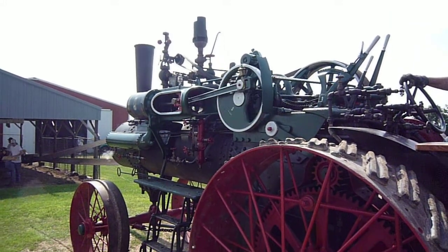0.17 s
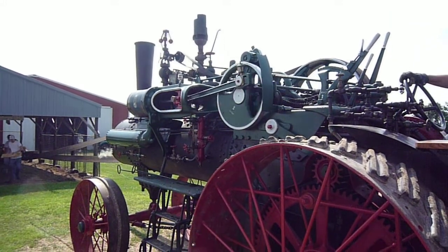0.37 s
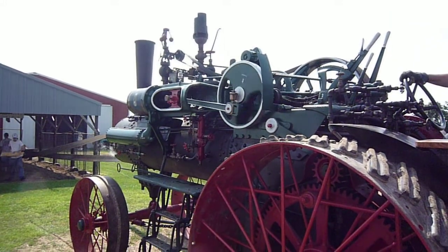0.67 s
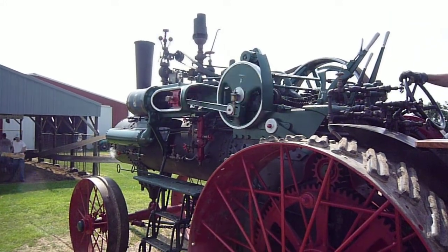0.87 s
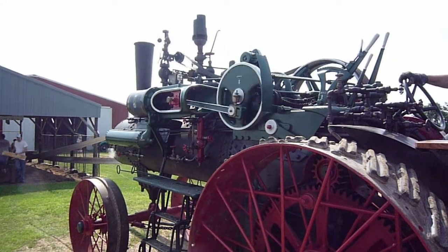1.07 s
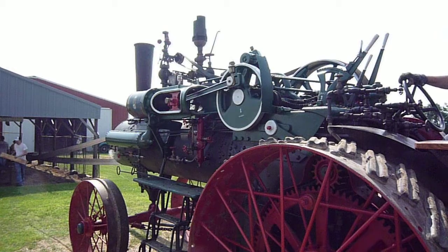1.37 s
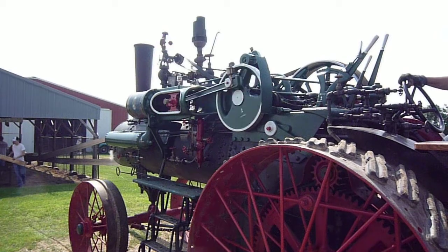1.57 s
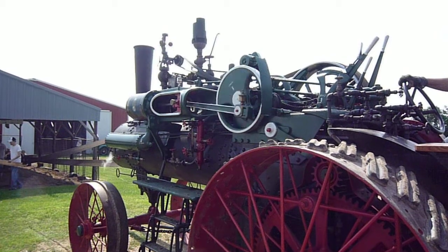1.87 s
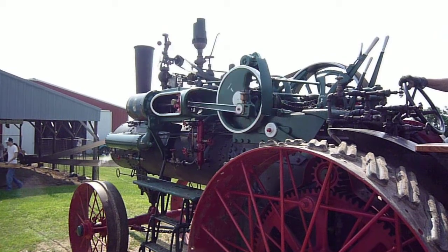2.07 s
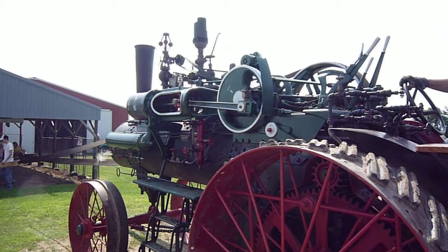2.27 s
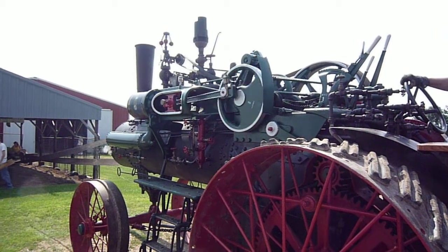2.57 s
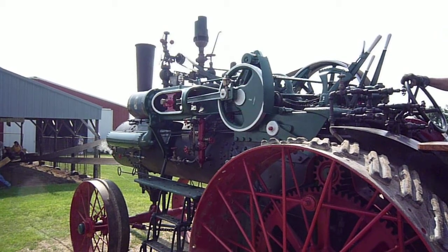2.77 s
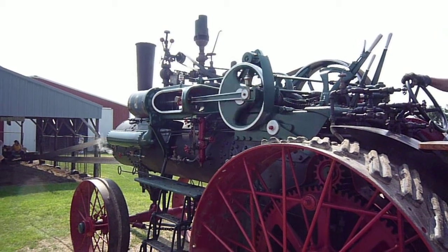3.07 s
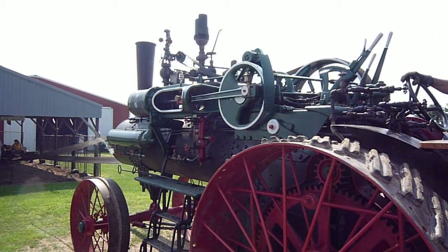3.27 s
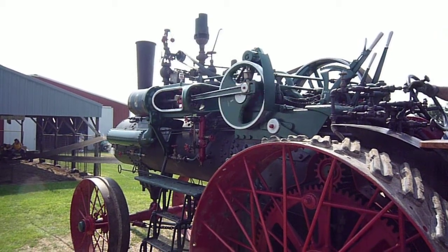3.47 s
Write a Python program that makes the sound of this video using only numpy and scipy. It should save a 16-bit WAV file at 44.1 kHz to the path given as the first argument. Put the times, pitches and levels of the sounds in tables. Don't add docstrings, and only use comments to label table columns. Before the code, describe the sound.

A steam traction engine runs throughout, outdoors and close. Uneven clusters of metallic knocks repeat about every 0.2 s, ringing a hollow casing near 1 kHz. Low exhaust thumps come every quarter second over rumbling, droning gear noise. Faint metal rings at 0.6-0.7 and 1.7 s, weak hiss at 0.6 s, a stronger steam spit near 1.3 s, then a clink and abrupt click-like skip around 1.39 s. Muffled treble; continues to the end.

```python
import sys
import numpy as np
from scipy import signal
from scipy.io import wavfile
from scipy.ndimage import uniform_filter1d

SR = 44100
rng = np.random.default_rng(int(sys.argv[2]) if len(sys.argv) > 2 else 0)


def linear_from_db(decibels):
    return 10 ** (np.asarray(decibels, float) / 20)


def inscribe(sig):
    pcm = np.round(np.clip(np.atleast_2d(sig).T, -1, 1) * 32767)
    wavfile.write(sys.argv[1], SR, pcm.astype(np.int16))


N = 160083
CUT_S, LOST = 1.38703, 997
M = N + LOST
FIRST_S, STROKE_S = -.0444, .20536

# offset t/s, frame level/dB, tines level/dB, plate level/dB, latch level/dB
STROKE_KNOCKS = [(-.078, -34, -48, -48.5, -48.5), (-.055, -27, -36, -47, -35.5),
                 (-.040, -30, -57.5, -50, -46.5), (0, -26.5, -39, -35, -35.5),
                 (0.01, -30.5, -50, -48.5, -45), (0.023, -33.5, -44.5, -40, -45.5),
                 (.034, -28.5, -38, -40.5, -39.5), (.088, -31.5, -55.5, -50.5, -38)]
# lift level/dB, slam level/dB, rebound level/dB, latch level/dB
STROKE_STRENGTHS = [(0.1, 0.1, 7.3, 0.5), (0.1, 1.5, 1.5, -0.5), (-1.5, -1.5, 0.5, -2), (1, 1, 2, 1),
                    (-0.3, 0.4, 0.5, 5.5), (1.4, 1, 3, 1.2), (1.5, -1.5, 3, 2), (-1, 4.7, 0, 0),
                    (-1.1, 1, 3, 0.5), (-1.7, 0.5, -0.5, 0.5), (-2, -1.5, 0.5, 0), (-0.5, 0, -1.5, -6),
                    (-1, 0, 3, -2), (-1.5, -1, 1.5, 0.8), (-0.4, 1, -2, 1.5), (0, 1.5, 2.5, 0),
                    (1.5, 1.5, 0.5, -1.5), (-0.2, 0.8, 2.1, 0), (-1.3, 4.5, 0.1, 0.1)]
KNOCK_GROUP = [0, 0, 0, 1, 1, 2, 2, 3]


def evened(x):
    return x / np.sqrt(np.mean(x ** 2) + 1e-20)


def resonate(x, hz, width):
    return signal.lfilter(*signal.iirpeak(hz, hz / width, SR), x)


def place(s):
    return round(s * SR) + LOST * (s > CUT_S)


def add(mix, at, sound):
    sound = sound[max(-at, 0):]
    part = mix[max(at, 0):][:len(sound)]
    part += sound[:len(part)]


def clatter():
    # f/Hz, bandwidth/Hz, level/dB
    frame_modes = [(244, 92, -10.5), (457.5, 36, -3.5), (580, 140, -6.5), (796, 210, -4), (962, 86, -3),
                   (1135, 190, -5), (1281, 51, -5.5), (1600, 240, -12)]
    tine_modes = [(2404, 97, 0.1), (2842, 43, 0.1), (3210, 84, 0.1)]
    plate_modes = [(2020, 600, -18.5), (3140, 99, -2), (3424, 50, -1.2), (3717, 270, 0), (3940, 130, 1.5)]
    latch_modes = [(1832, 41, 0.9), (1750, 140, -3)]
    scrape_s = [.007, .003, .0022, .004]
    blow_share = [.25, .45, .65, .45]
    slop_s, slop_db, colour_db = .0008, .5, 1.2
    rattle_per_s, rattle_db = 550, -42

    out = np.zeros(M)
    t = np.arange(-600, 1200) / SR
    knocks = np.array(STROKE_KNOCKS)
    strengths = np.array(STROKE_STRENGTHS)[:, KNOCK_GROUP]
    luck = rng.standard_normal((len(strengths), len(knocks), 40))

    size = linear_from_db(3 * np.minimum(rng.exponential(1, M), 3))
    struck = rng.random(M) < rattle_per_s / SR
    rattle = linear_from_db(rattle_db) * size * struck * rng.standard_normal(M)

    stroke_start = FIRST_S + np.arange(len(strengths))[:, None] * STROKE_S
    at = stroke_start + knocks[:, 0] + slop_s * luck[..., 0]
    at = np.round(at * SR).astype(int)
    inside = (at >= 0) & (at < M)
    for b, modes in enumerate([frame_modes, tine_modes, plate_modes, latch_modes]):
        scrape = np.exp(-(t / scrape_s[b]) ** 2) + .15 * np.exp(-abs(t) / .012)
        share = blow_share[b]
        for m, (hz, width, db) in enumerate(modes):
            level = knocks[:, b + 1] + strengths + slop_db * luck[..., 1]
            level += colour_db * luck[..., 2 + b * len(frame_modes) + m]
            train = np.zeros(M)
            train[at[inside]] = linear_from_db(level[inside])
            rub = signal.oaconvolve(train, scrape)[600:][:M] * rng.standard_normal(M)
            blow = np.linalg.norm(scrape) * rng.choice([-1, 1]) * train
            push = np.sqrt(1 - share ** 2) * rub + share * blow
            gain = linear_from_db(db) * np.sqrt(SR / width / 4)
            out += gain * resonate(push + rattle, hz, width)
    return out


def drum():
    knock_db = [-39, -32.5, -22.5, -23.5, -23, -27.5, -25.5, -33]
    pitch_hz, spread, rise_s, fall_s = 984, 0.036, 0.003996, .008
    out = np.zeros(M)
    t = np.arange(0, .06, 1 / SR)
    shape = (1 - np.exp(-t / rise_s)) ** 2 * np.exp(-t / fall_s)
    shape = shape / shape.max()
    luck = rng.standard_normal((len(STROKE_STRENGTHS), len(STROKE_KNOCKS), 3))
    for k, strength in enumerate(STROKE_STRENGTHS):
        for j, knock in enumerate(STROKE_KNOCKS):
            bend, push, turn = luck[k, j]
            tone = np.sin(2 * np.pi * (pitch_hz * (1 + spread * bend) * t + turn))
            level = knock_db[j] + strength[KNOCK_GROUP[j]] + push
            at = FIRST_S + k * STROKE_S + knock[0] - rise_s
            add(out, round(at * SR), linear_from_db(level) * shape * tone)
    return out


def stack():
    # t/s, level/dB
    chuffs = [(0.0, -28.5), (0.243, -28.5), (0.504, -29), (0.76, -28.5), (1.01, -37.5), (1.271, -29),
              (1.497, -26.5), (1.753, -32), (2.012, -30), (2.272, -30.5), (2.519, -27), (2.771, -29),
              (3.029, -38), (3.275, -31), (3.537, -29)]
    stack_hz, rise_s, fall_s = 76, 0.007, 0.02
    out = np.zeros(M)
    t = np.arange(9000) / SR
    shape = (1 - np.exp(-t / rise_s)) * np.exp(-t / fall_s)
    thump = shape / shape.max() * np.sin(2 * np.pi * stack_hz * t)
    for s, db in chuffs:
        add(out, place(s), linear_from_db(db - 2.5) * thump)
    return out


def clinks():
    # t/s, f/Hz, level/dB, length/s
    rings = [
        (0.11, 3430, -37.5, .035),
        (.61, 2536, -42, 0.15),
        (.645, 3424, -41, 0.071),
        (.70, 3585, -44, 0.078),
        (1.372, 2220, -28.5, 0.028),
        (1.445, 2230, -40.5, 0.052),
        (1.70, 2536, -40.5, 0.15),
        (1.735, 3418, -40.5, 0.05),
        (3.17, 3460, -45, 0.045),
    ]
    out = np.zeros(M)
    for s, hz, db, length in rings:
        t = np.arange(0, length, 1 / SR)
        swell = np.sin(np.pi * (t / length) ** 0.37)
        add(out, place(s), swell * linear_from_db(db) * np.sin(2 * np.pi * hz * t))
    return out


def steam_spits():
    # t/s, length/s, level/dB
    leaks = [
        (1.305, .11, -34),
        (.60, .17, -40),
    ]
    out = np.zeros(M)
    hiss = evened(resonate(rng.standard_normal(M), 2900, 1900))
    for s, length, db in leaks:
        t = np.arange(0, length, 1 / SR)
        add(out, place(s), np.sin(np.pi * t / length) * linear_from_db(db) * hiss[place(s):][:len(t)])
    return out


def wash():
    # f/Hz, level/dB (per Hz)
    spectrum = [(35, -41), (60, -3), (211, -3.5), (309, -3), (719, -4.5), (947, 2), (1460, -8.5),
                (3280, -19.5), (3700, -21.5), (4810, -47), (8140, -120)]
    wash_db = -29.5
    surge_db, surge_s = 0.6, .005
    third_db, third_s = 1, 0.026
    surge_hz = 500
    frames = M // 256 + 5
    hz = np.fft.rfftfreq(1024, 1 / SR)
    a, b, patches = rng.standard_normal((frames, len(hz), 3)).T
    patches = uniform_filter1d(patches, size=10, axis=0)
    patches = evened(uniform_filter1d(patches, size=8, axis=1))
    f, db = np.transpose(spectrum)
    shape = np.interp(np.log(hz + 1), np.log(f), db)
    beat = 2 * np.pi / STROKE_S
    turn = beat * (np.arange(frames) * 256 / SR - FIRST_S)
    surge = surge_db * np.cos(turn - beat * surge_s)
    surge += third_db * np.cos(3 * (turn - beat * third_s))
    treble = hz ** 2 / (hz ** 2 + surge_hz ** 2)
    shape = shape[:, None] + surge * treble[:, None]
    z = (a + 1j * b) * linear_from_db(shape + 1.8 * patches)
    out = signal.istft(z, nperseg=1024, noverlap=768)[1][:M]
    return linear_from_db(wash_db) * evened(out)


def drones():
    # f/Hz, bandwidth/Hz, level/dB
    drone_bands = [(151, 42, -41), (197, 28, -37.5), (249, 23, -37.5), (370.3, 37, -39), (470.5, 59, -40),
                   (597, 68, -37), (800, 40, -42), (964, 240, -42.5)]
    out = np.zeros(M)
    for hz, width, db in drone_bands:
        out += linear_from_db(db) * evened(resonate(rng.standard_normal(M), hz, width))
    return out


def lowpass(x, hz, taps):
    kernel = signal.firwin(taps, hz, window=("kaiser", 10), fs=SR)
    return signal.oaconvolve(x, kernel, "same")


def narrow_band(x):
    y = lowpass(x, 3768, 401) + linear_from_db(-12) * lowpass(x, 4360, 281)
    return signal.sosfilt(signal.butter(2, 61, "high", fs=SR, output="sos"), y)


def lose_stretch(y):
    jump, settle_s = .1, .0006
    cut = round(CUT_S * SR)
    y = np.delete(y, np.arange(LOST) + cut)
    t = (np.arange(N) - cut + .5) / SR
    step = (jump - y[cut] + y[cut - 1]) / 2
    return y + step * np.sign(t) * np.exp(-abs(t) / settle_s)


def scene():
    ceiling = .6
    mix = clatter() + drum() + stack() + clinks() + steam_spits() + wash() + drones()
    mix = ceiling * np.tanh(mix / ceiling)
    return lose_stretch(narrow_band(mix))[None]


def low_pass(x):
    return signal.sosfilt(signal.butter(12, 16000, fs=SR, output="sos"), x)


def record(dry):
    mix = dry - .0516
    return low_pass(mix)


dry = scene()
out = record(dry)
inscribe(out)
```